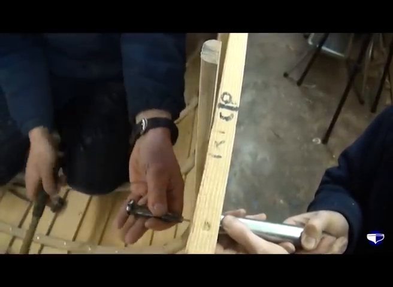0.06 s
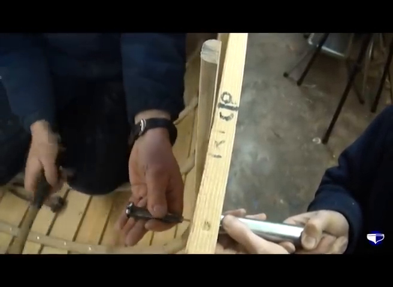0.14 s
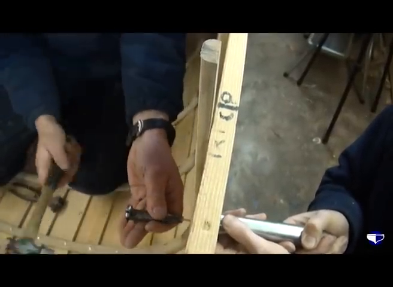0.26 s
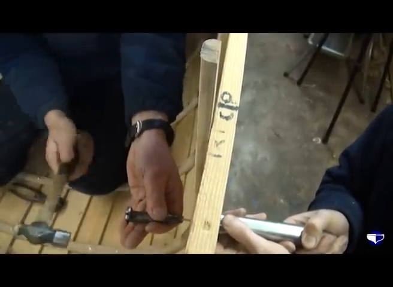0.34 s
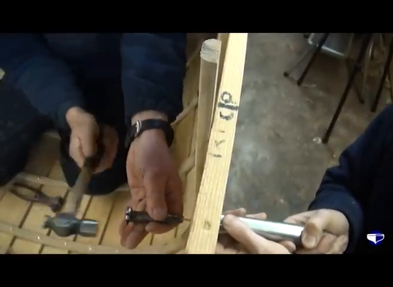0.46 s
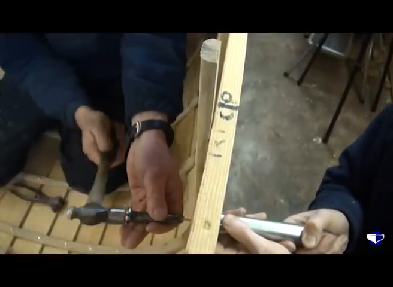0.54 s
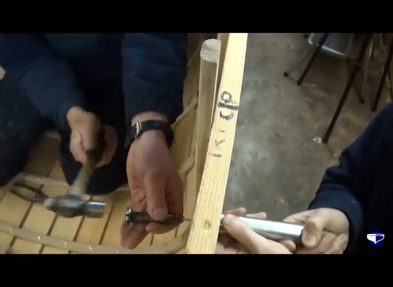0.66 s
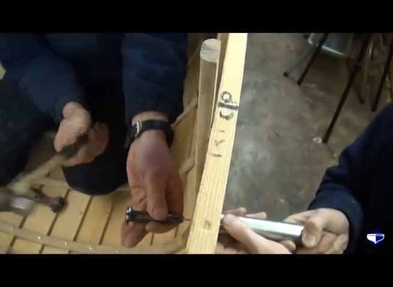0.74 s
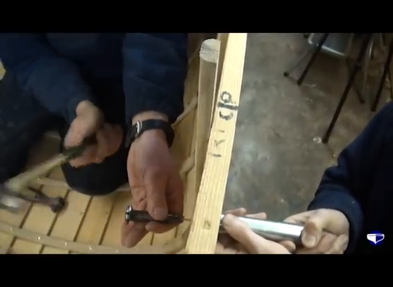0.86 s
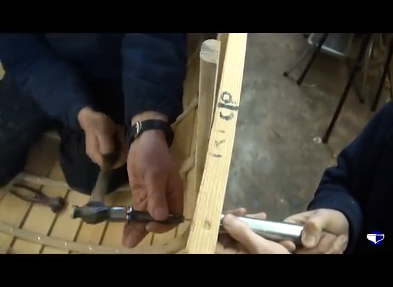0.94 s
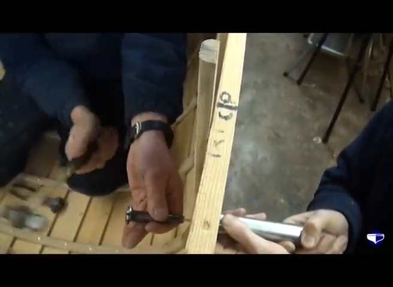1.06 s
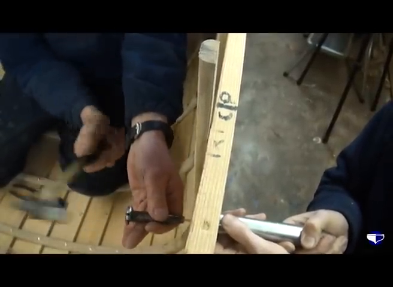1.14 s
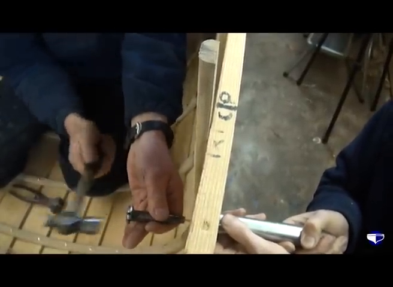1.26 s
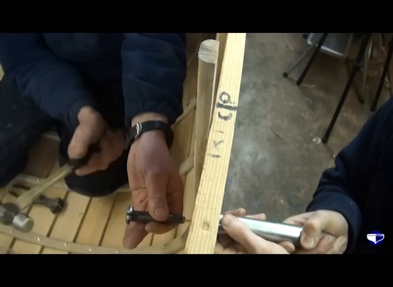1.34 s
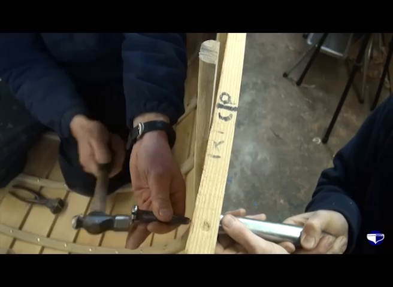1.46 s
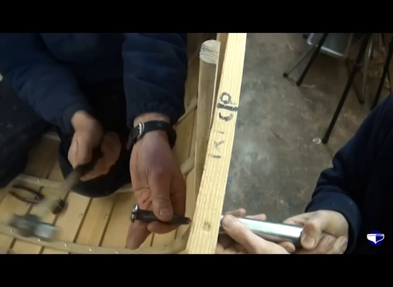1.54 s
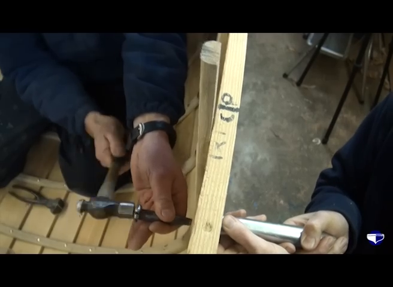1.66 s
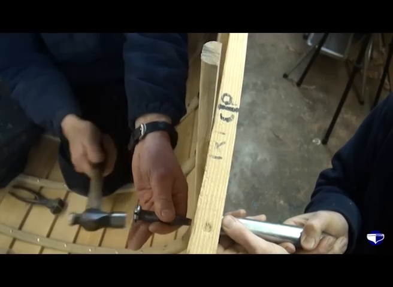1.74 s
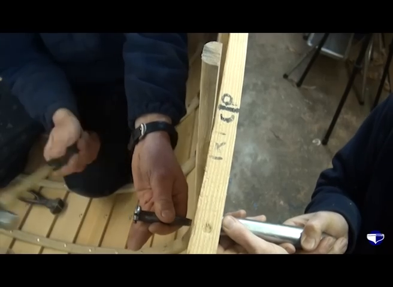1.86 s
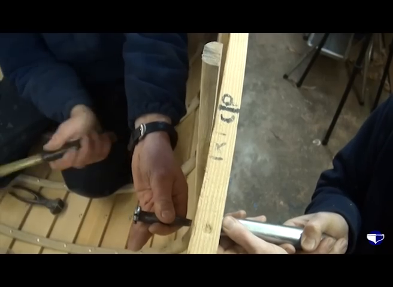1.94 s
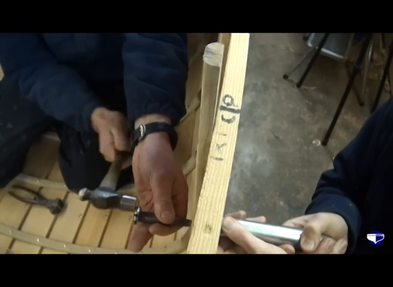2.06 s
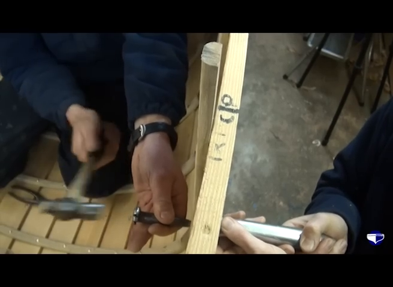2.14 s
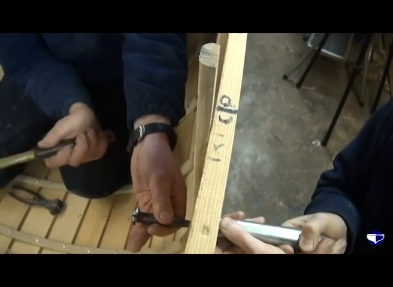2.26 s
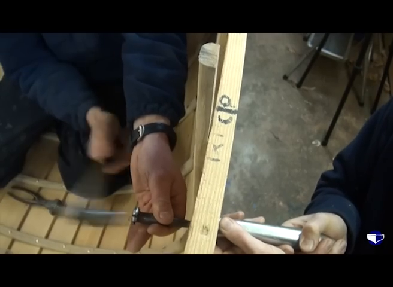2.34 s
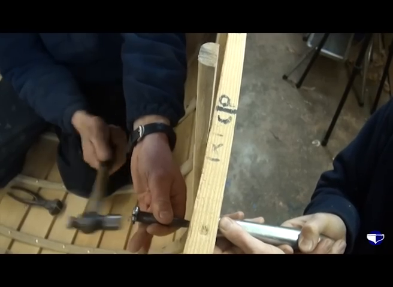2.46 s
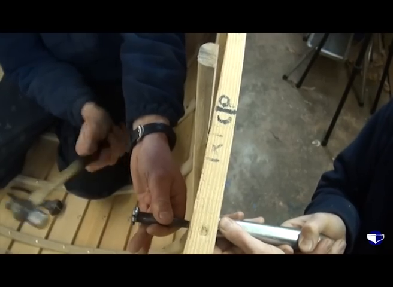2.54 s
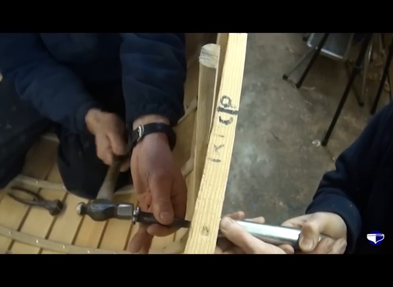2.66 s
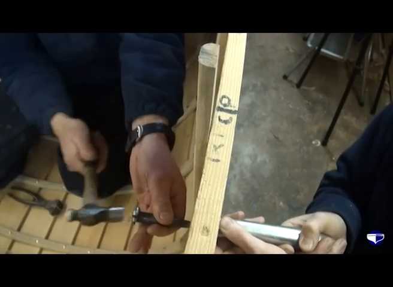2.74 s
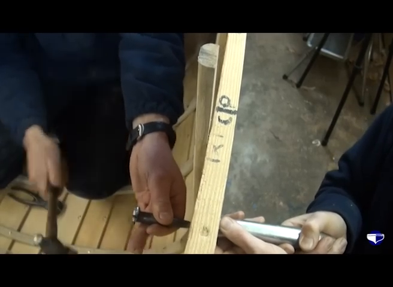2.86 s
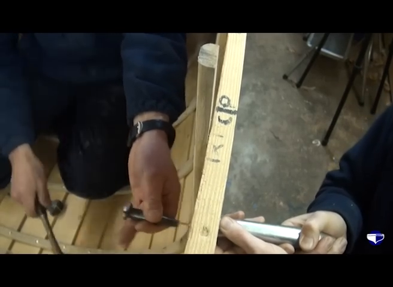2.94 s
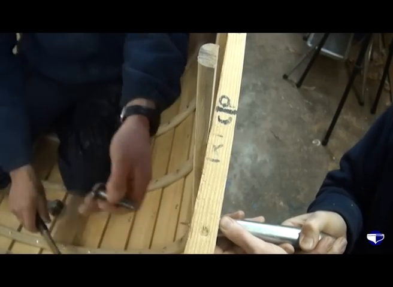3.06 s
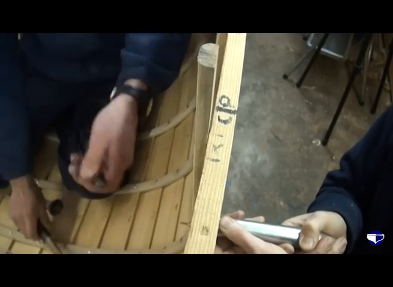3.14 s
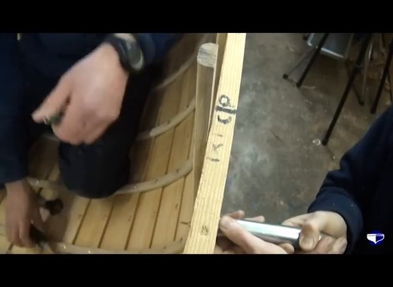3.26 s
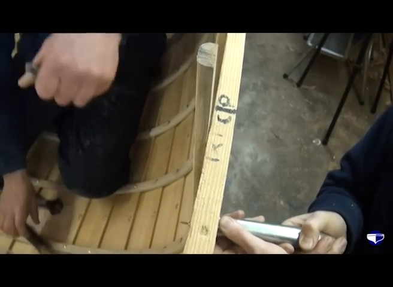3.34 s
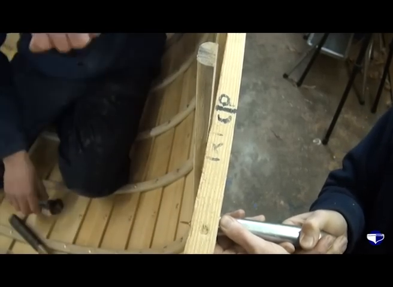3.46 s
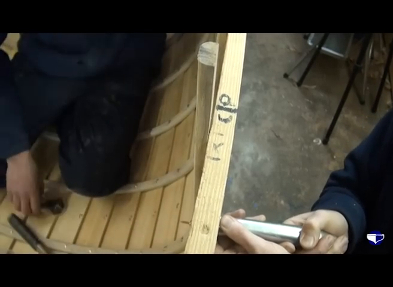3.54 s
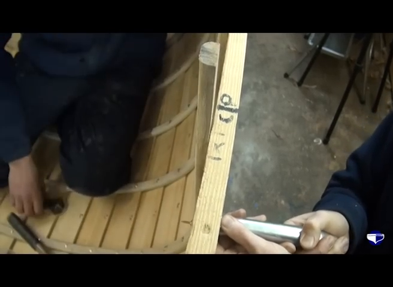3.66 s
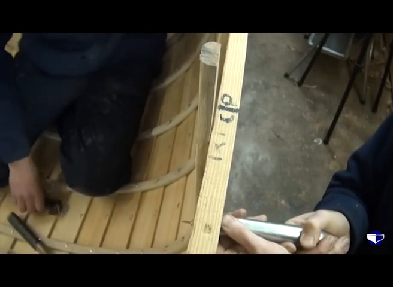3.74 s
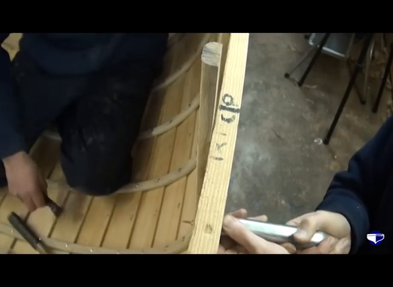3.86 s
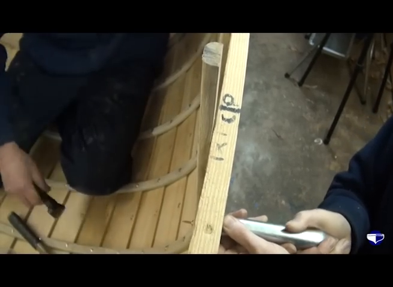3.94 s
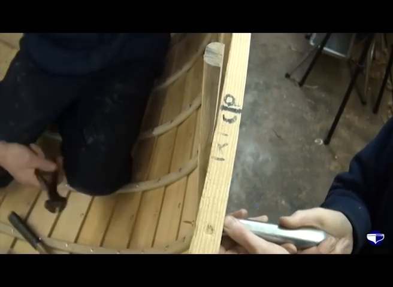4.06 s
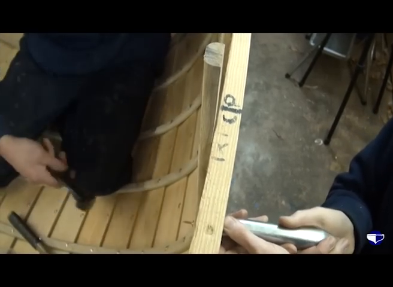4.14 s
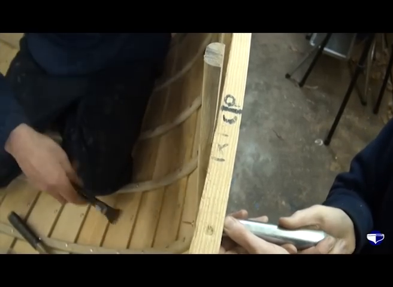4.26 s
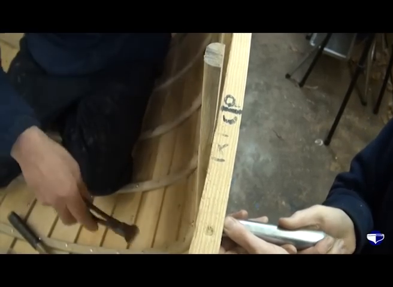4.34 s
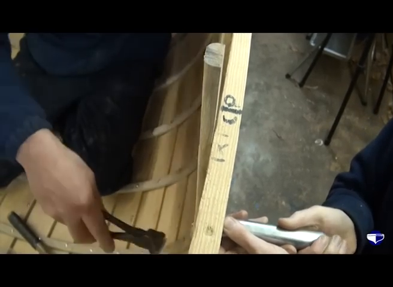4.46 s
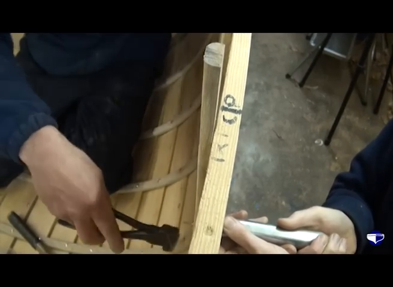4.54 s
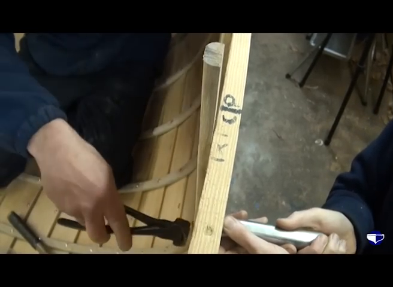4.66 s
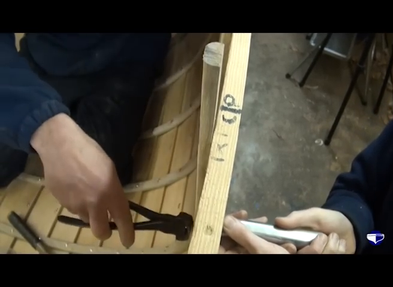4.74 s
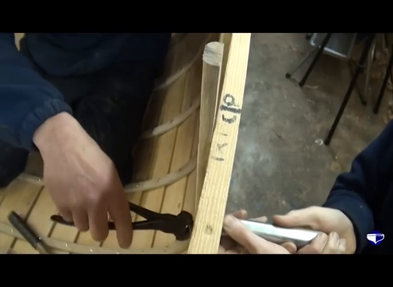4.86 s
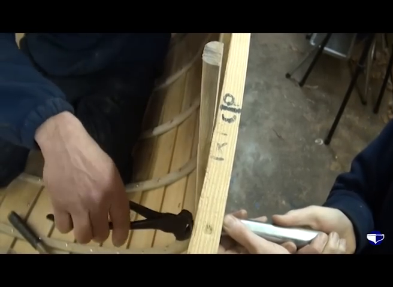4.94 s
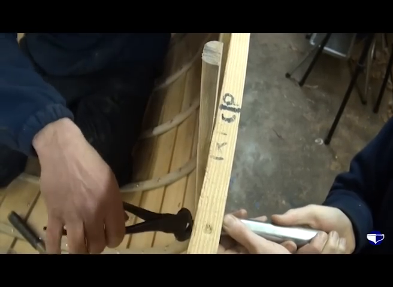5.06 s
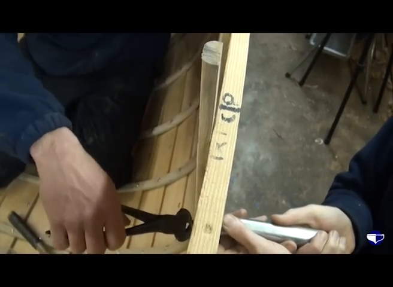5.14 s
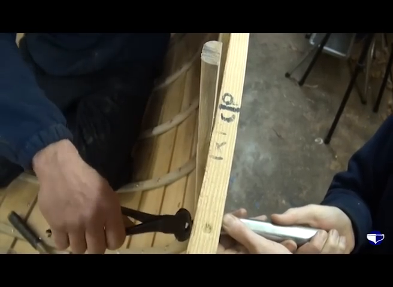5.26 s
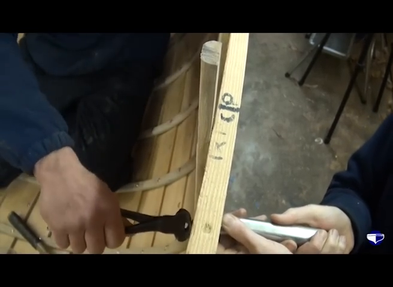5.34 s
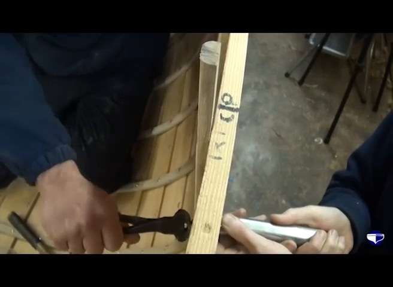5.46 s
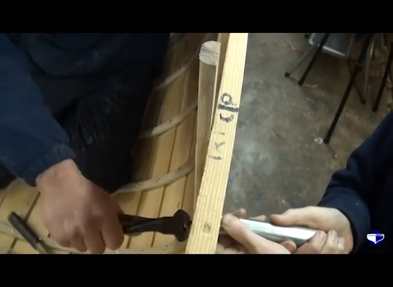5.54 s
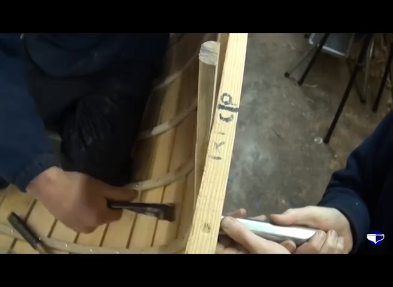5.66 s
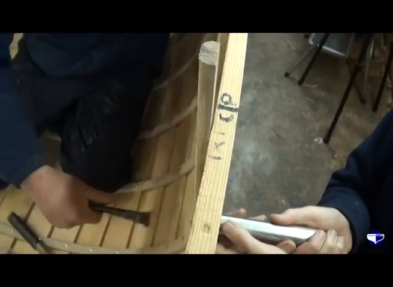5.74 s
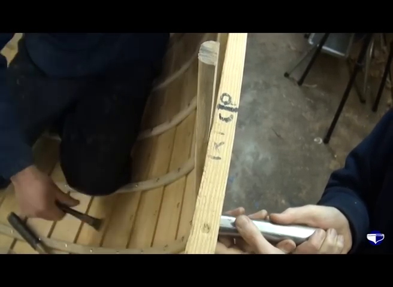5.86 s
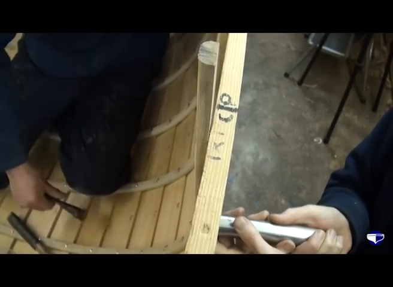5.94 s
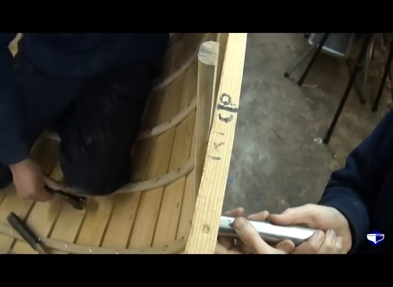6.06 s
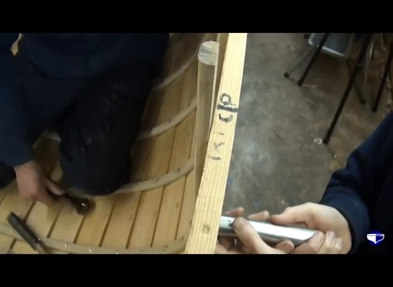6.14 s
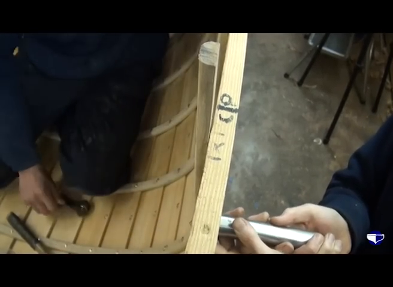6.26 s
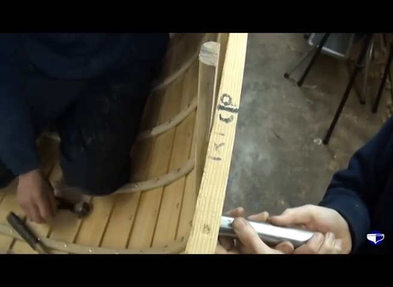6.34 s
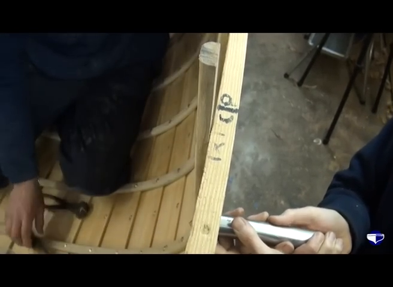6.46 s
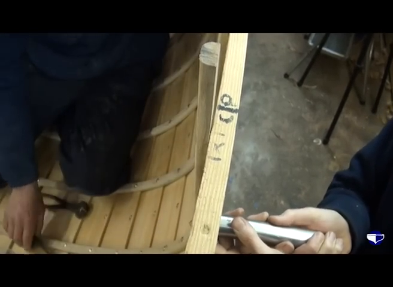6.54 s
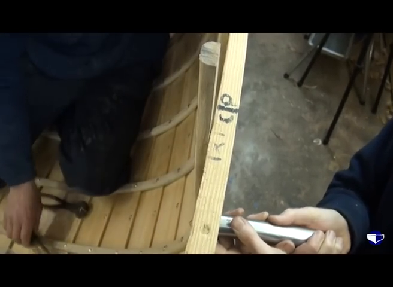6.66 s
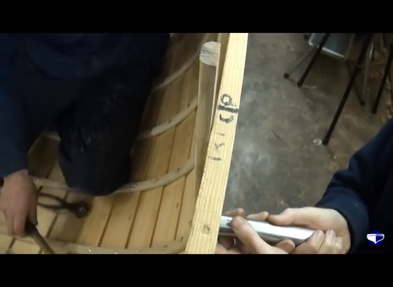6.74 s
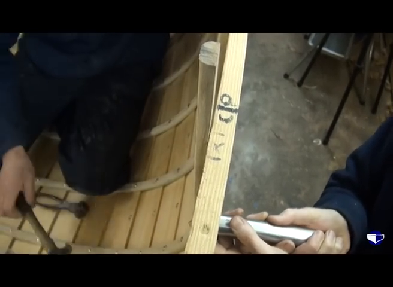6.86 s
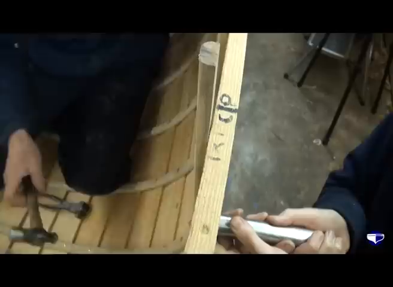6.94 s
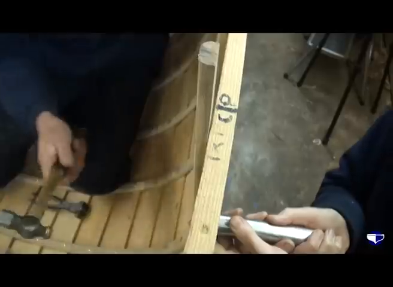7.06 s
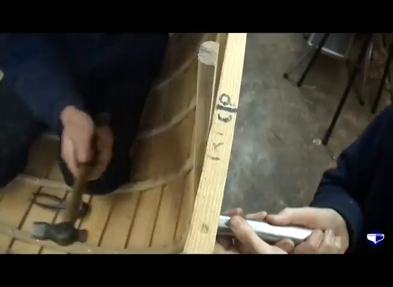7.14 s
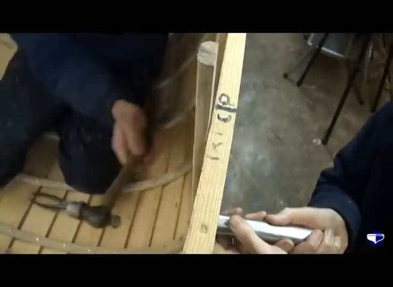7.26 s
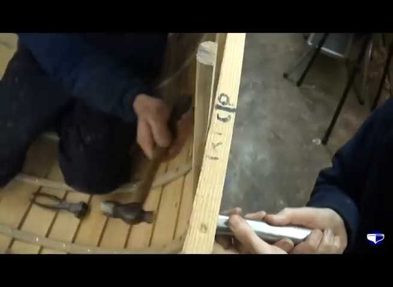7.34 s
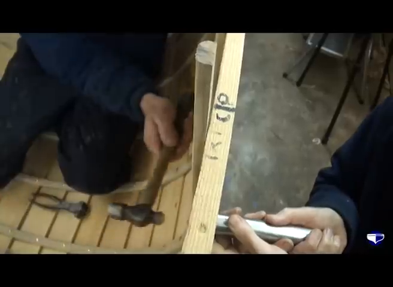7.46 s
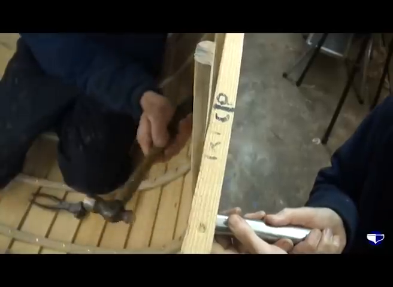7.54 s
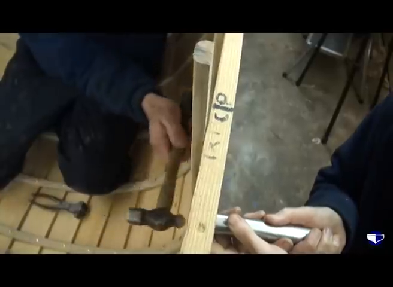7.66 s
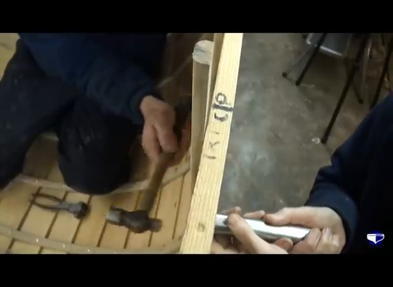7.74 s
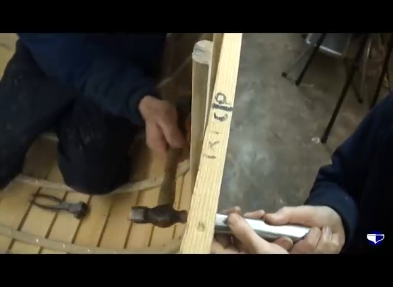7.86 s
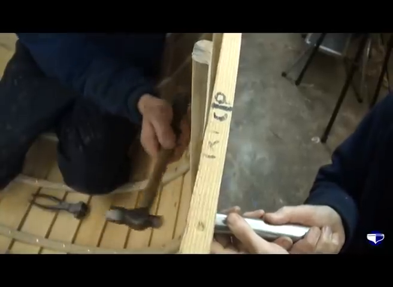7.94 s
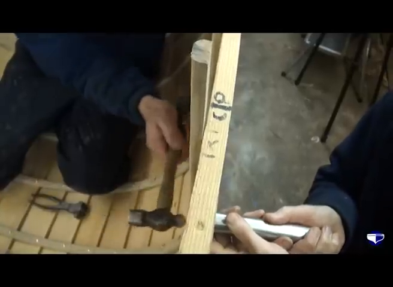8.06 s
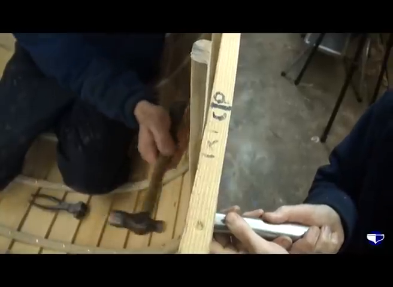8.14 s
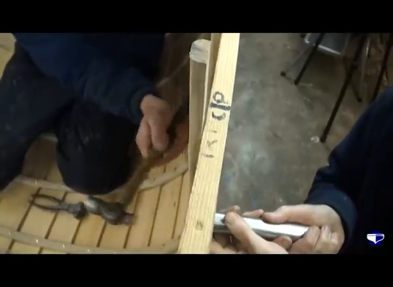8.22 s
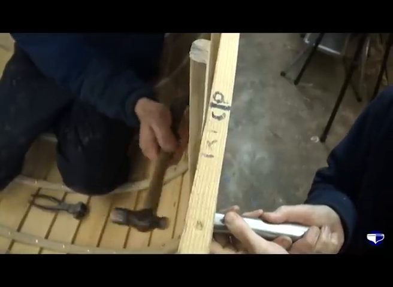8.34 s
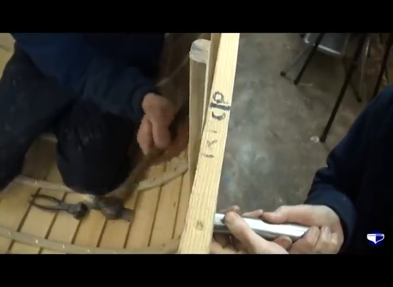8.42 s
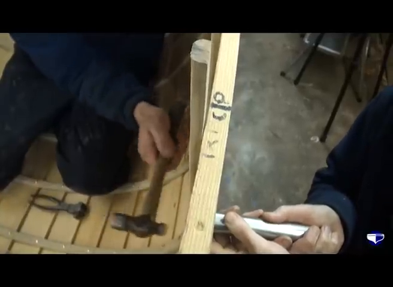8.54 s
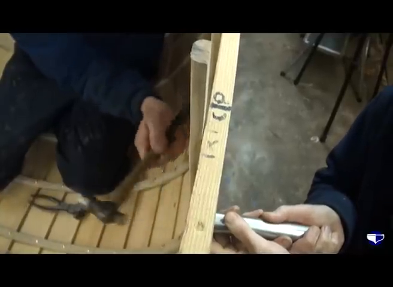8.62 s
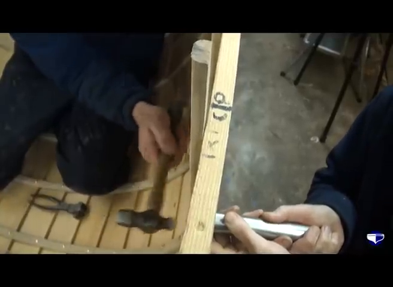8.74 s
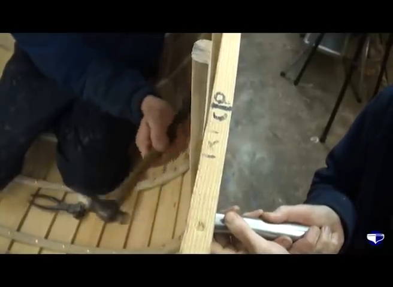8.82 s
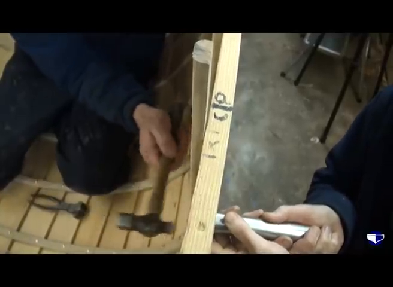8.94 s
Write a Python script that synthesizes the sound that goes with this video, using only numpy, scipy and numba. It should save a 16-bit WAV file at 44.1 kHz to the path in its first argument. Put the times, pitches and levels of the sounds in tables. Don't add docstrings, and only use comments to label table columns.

```python
import sys
import numpy as np
from scipy import signal
from scipy.fft import rfft, irfft
from scipy.io import wavfile
from scipy.ndimage import uniform_filter1d, map_coordinates
from numba import njit

SR = 44100
rng = np.random.default_rng(int(sys.argv[2]) if len(sys.argv) > 2 else 0)


def undo_db(level):
    steps = np.asarray(level, float) / 20
    return 10 ** steps


def transcribe(u):
    v = np.clip(np.atleast_2d(u).T, -1, 1)
    q = np.round(v * 32767).astype(np.int16)
    wavfile.write(sys.argv[1], SR, q)


N = 396459


def along(points, hz):
    f, v = np.transpose(points)
    return np.interp(np.log(hz + 1), np.log(f + 1), v)


def unit(x):
    return x / np.sqrt(np.mean(x ** 2, axis=(-2, -1), keepdims=True) + 1e-20)


def add(out, sounds, times):
    for sound, s in zip(sounds, times):
        part = out[..., round(s * SR):][..., :sound.shape[-1]]
        part += sound[..., :part.shape[-1]]
    return out


def wander(count, length, step):
    return step * np.cumsum(rng.standard_normal((count, length)), axis=1)


# (frequency [Hz], left minus right [dB])
LEAN = [(60, -2.5), (180, -0.5), (400, 2), (950, 1.5), (3770, 1.05), (15000, 0.2)]
# (frequency [Hz], phase by which left leads [rad])
LEAD = [(60, -.1), (150, -0.78), (350, -0.98), (860, -0.99), (1400, -1.5), (2000, -.1), (15000, .01)]


def stereo(pair, gain, alike, aside=1):
    hz = np.fft.rfftfreq(pair.shape[-1], 1 / SR)
    turn = np.arccos(np.clip(along(alike, hz), -1, 1)) / 2
    turn = turn * np.where(hz < 11000, 1, 0.45)
    z = rfft(pair) * gain(hz)
    mid = z[..., 0, :] * np.cos(turn)
    side = z[..., 1, :] * np.sin(turn)
    lean = undo_db(aside * along(LEAN, hz) / 2) * np.exp(0.5j * aside * along(LEAD, hz))
    both = np.stack([(mid + side) * lean, (mid - side) / lean], axis=-2)
    return unit(irfft(both, pair.shape[-1]))


# (frequency [Hz], density [dB per Hz])
HISS_TONE = [(15, -40), (25, -6), (113, 3.5), (188, -0.5), (216, 3.5), (400, -8.5), (510, -10.5), (553, -7),
             (1180, -9.5), (4640, -14), (6950, -15), (9350, -16.5), (15600, -15)]
# (frequency [Hz], left-right likeness [-1 to 1])
HISS_ALIKE = [(60, 0.84), (180, 1), (550, 0.3), (1650, 0.28), (4970, 0.58), (15000, 1.0)]


def hiss():
    def gain(hz):
        tone_db = along(HISS_TONE, np.minimum(hz, 15000)) + 2.5 * (hz > 11300)
        return undo_db(tone_db) * (hz < 15760)
    return undo_db(-66.5) * stereo(rng.standard_normal((2, N)), gain, HISS_ALIKE, aside=0.3)


def lumps(rate, depth_db):
    knots = rng.standard_normal(int(N * rate / SR) + 4)
    return undo_db(depth_db * map_coordinates(knots, [np.arange(N) * rate / SR]))


# (frequency [Hz], left-right likeness [-1 to 1])
ALIKE = [(40, 0.8), (90, 1), (200, 0.91), (380, 0.44), (700, 0.53), (1290, 0.03), (2380, 0.58),
         (4400, 0.68), (8120, 0.55), (15000, 0.36)]
# (frequency [Hz], density [dB per Hz])
CREAK_TONE = [(18, -61.5), (30, -23), (70, -8.5), (245, -5), (680, -12), (1000, -14.5), (1500, -25),
              (3000, -28.5), (3900, -50.5), (6600, -120)]
# (frequency [Hz], density [dB per Hz])
CLOTH_TONE = [(590, -28.5), (1000, 1.5), (1550, -1), (3170, 0), (4200, -3), (7220, -10.5), (11000, -13),
              (14300, -62.5), (22000, -120)]
# (time [s], length [s], level [dB], cloth over creak [dB])
SHIFTS = [(-.05, .14, -47.5, -8), (0.097, 0.087, -51.5, -3), (0.224, 0.43, -56.5, -6),
          (0.333, 0.056, -53, -25), (0.803, 0.26, -57.5, -8.5), (2.979, 0.031, -58, 6.5),
          (3.66, 0.18, -59, -11), (4.04, 0.14, -76.5, 5), (4.95, 0.41, -71, -11), (5.653, 0.12, -57.5, -14),
          (5.8, 0.45, -67.5, -5), (6.62, 0.18, -56, -5.5), (6.834, 0.65, -64.5, -4),
          (7.21, 0.097, -58.5, -3.5), (7.4, 0.22, -63.5, -2.5), (7.598, 0.094, -59.5, -3.5)]


def stir():
    s, length, db, cloth_db = np.transpose(SHIFTS)[:, :, None]
    rise_s, fade_s = 0.042, 0.046
    t = np.arange(N) / SR - s
    move = undo_db(db) * np.clip(t / rise_s, 0, 1) * np.exp(-np.clip(t - length, 0, None) / fade_s)
    low = stereo(rng.standard_normal((2, N)), lambda hz: undo_db(along(CREAK_TONE, hz)), ALIKE)
    high = stereo(rng.standard_normal((2, N)), lambda hz: undo_db(along(CLOTH_TONE, hz)), ALIKE)
    creak = move.sum(axis=0) * unit(low * lumps(40, depth_db=3.5))
    cloth = (move * undo_db(cloth_db)).sum(axis=0) * unit(high * lumps(120, depth_db=2.5))
    return creak + cloth


# (time [s], level [dB], frequency [Hz], t60 [s])
HUMS = [
    (3.8, -49, 253.6, 0.15),
    (2.8, -63, 261, 0.43),
    (4.054, -65.5, 333, 0.37),
    (5.5, -24.5, 320, 0.156),
    (7.3, -67, 740, 0.38),
]


def hums():
    s, db, hz, t60 = np.transpose(HUMS)[:, :, None]
    t = np.arange(SR // 3) / SR
    phase = 2 * np.pi * hz * t + wander(len(HUMS), len(t), 0.016)
    swell = 1 - np.exp(-t / 0.0079)
    return add(np.zeros(N), undo_db(db + 9.5 - 60 * t / t60) * swell * np.sin(phase), s.ravel())


# (time [s], level [dB], frequency [Hz])
TICKS = [(0.1214, -46, 1680), (0.2109, -43.5, 1720), (0.402, -29.5, 2360), (6.2748, -33, 2850),
         (6.2752, -40, 5480), (6.466, -38, 5900), (6.469, -36, 4000), (6.5664, -38.5, 1672),
         (7.2719, -42.5, 1856), (7.3307, -48, 2276), (7.3971, -50, 2133), (7.4418, -41.5, 3047),
         (7.5083, -56, 2566), (7.647, -45, 3180), (7.6941, -51, 2967)]


def ticks():
    s, db, hz = np.transpose(TICKS)[:, :, None]
    t = np.arange(SR // 20) / SR
    phase = 2 * np.pi * hz * t + wander(len(TICKS), len(t), 0.16)
    return add(np.zeros(N), undo_db(db - 3.5 - 60 * t / 0.02) * np.sin(phase), s.ravel())


# (time [s], level [dB], low pair [dB], high modes [dB], lowest mode [dB])
CLINKS = [
    (3.7073, -41.5, -6, -12, .1),
    (4.0721, -51.5, 9, 4.5, 1),
    (4.1013, -38, 2, 0, 2),
    (4.1599, -41.5, 11, 0, -6),
    (6.2748, -42, 6, -1, -6),
    (6.406, -20, 2.5, 1, 5),
    (6.4652, -40, -8, 3, .1),
    (6.563, -42, -4, -14, .1),
    (6.8011, -50.5, -11, -7, 0.5),
]
# (frequency [Hz], level [dB], t60 in the hand [s], t60 on the planks [s])
JAWS = [(2554, -9, 0.1, .04), (2810, -6, 0.12, .05), (4530, -4, .08, 0.095), (5480, -6.5, 0.1, .07),
        (5800, -9, .07, .1), (8270, -20, .18, 0.13), (9030, -20, .09, 0.097)]


def clinks():
    t = np.arange(SR // 4) / SR
    hz, level_db, held_s, laid_s = np.transpose(JAWS)[:, :, None]
    s, db, pair_db, high_db, lowest_db = np.transpose(CLINKS)[:, :, None, None]
    mode_db = level_db + (hz < 3500) * pair_db + (hz > 5000) * high_db + (hz == hz.min()) * lowest_db
    mode_db = mode_db + 0.7 * rng.standard_normal((len(CLINKS), len(JAWS), 1))
    phase = 2 * np.pi * hz * t + wander(len(JAWS), len(t), 0.053)
    t60 = np.where(s < 4.5, held_s, laid_s)
    modes = (np.sin(phase) * undo_db(mode_db - 60 * t / t60)).sum(axis=1) * (1 - np.exp(-t / 0.00048))
    crack = 0.3 * undo_db(-60 * t / 0.006) * rng.standard_normal((len(CLINKS), len(t)))
    return add(np.zeros(N), undo_db(db[:, 0] - 9) * (modes + crack), s.ravel())


# (time [s], level [dB], frequency [Hz], length [s])
THUDS = [(3.247, -25, 240, 0.0076), (3.341, -25.5, 698, 0.0061), (3.394, -23, 333, 0.014),
         (4.766, -38.5, 310, .007), (4.834, -36.5, 300, 0.013), (5.541, -21.5, 285, .016),
         (5.594, -32, 300, .012), (6.209, -21, 230, 0.012), (6.248, -20, 420, 0.0084),
         (6.27, -22, 310, 0.015), (6.39, -15.5, 194.7, .02), (6.412, -15.5, 240, 0.016),
         (6.445, -24, 240, .01), (6.464, -24, 250, .016), (6.488, -25, 260, 0.0095)]


def thuds():
    s, db, hz, length = np.transpose(THUDS)[:, :, None]
    t = np.arange(SR // 20) / SR
    swing = np.sin(np.pi * np.clip(t / (1.25 * length), 0, 1)) ** 0.77
    return add(np.zeros(N), undo_db(db) * np.nan_to_num(swing) * np.sin(2 * np.pi * hz * t), s.ravel())


# (time [s], level [dB], top frequency [Hz], t60 [s])
CRACKS = [(.6073, -19.5, 6000, .006), (3.2392, -29.5, 4000, .012), (3.2546, -25, 6500, .012),
          (3.33, -32, 4000, 0.018), (3.3665, -30, 4500, 0.018), (3.4005, -32, 6000, .015),
          (4.1598, -53, 5000, .015), (4.772, -42, 4970, .015), (4.817, -43.5, 6500, .02),
          (6.2066, -35, 6000, .012), (6.2492, -29.5, 4000, .012), (6.3973, -33, 5000, .012),
          (6.4652, -33, 6000, .012), (6.548, -50, 6000, .01), (7.7394, -24, 4000, .008)]


def cracks():
    s, db, top_hz, t60 = np.transpose(CRACKS)[:, :, None]
    t = np.arange(2048) / SR
    hz = np.fft.rfftfreq(len(t), 1 / SR)
    burst = rng.standard_normal((len(s), len(t))) * undo_db(db - 0.5 - 60 * t / t60)
    low_cut = (1j * hz / 600) / (1 + 1j * hz / 600)
    return add(np.zeros(N), irfft(rfft(burst) * low_cut / (1 + 1j * hz / top_hz) ** 2), s.ravel())


# (frequency [Hz], level [dB], t60 [s])
SNIP_MODES = [(1055, -1, 0.14), (1184, -7.5, 0.26), (1260, -1.5, 0.12), (1787, -24, 0.25),
              (2210, -30, 0.54), (3009, -20, 0.23), (3865, -27, 0.33), (4350, -19, 0.16), (4587, -25, 0.17)]


def snip():
    hz, db, t60 = np.transpose(SNIP_MODES)[:, :, None]
    t = np.arange(SR // 3) / SR
    phase = 2 * np.pi * hz * t + wander(len(hz), len(t), 0.035)
    modes = undo_db(-27.5 + db - 60 * t / t60) * np.sin(phase)
    ring = modes.sum(axis=0) * (1 - np.exp(-t / 0.002))
    return add(np.zeros(N), [ring], [5.503])


def resonances(peaks, hz):
    return sum(lift / (1 + (2 * (hz - centre) / width) ** 2) for centre, width, lift in peaks)


# (frequency [Hz], t60 [s])
SHOP = [(60, 0.88), (250, 0.49), (800, 0.43), (2500, 0.39), (6000, 0.31), (14000, 0.21)]
# (frequency [Hz], t60 [s])
HULL = [(60, 0.042), (300, 0.33), (1000, 0.19), (4000, 0.15), (14000, 0.043)]


def contacts(rows, rebound, tone, peaks, spots, drive_db, close_db, click_db, echo_db, gap, rise, same, snap, bloom):
    s, db, boom_db, knock_db, edge_db = np.transpose(rows)[:, :, None, None]
    spacing_hz, first_hz, share = np.transpose(rebound)[:, :, None, None]
    size = 3 * 2 ** 13
    t = np.arange(size) / SR
    draws = rng.standard_normal((len(rows) + 1, 2, size))

    def shared(common, own):
        return np.sqrt(same) * common + np.sqrt(1 - same) * own

    def gain(hz):
        lift_db = resonances(peaks, hz)
        lift_db = lift_db + resonances(np.transpose(spots, (1, 2, 0))[..., None, None], hz)
        place = np.log1p(hz / 300) / np.log1p(hz[-1] / 300) * 299
        knots = shared(draws[0, 0, :300], draws[1:, 0, :300])
        lift_db = lift_db + 2 * np.array([map_coordinates(row, [place]) for row in knots])[:, None]
        boom = 1 / (1 + (hz / 480) ** 4)
        knock = np.exp(-np.log((hz + 1) / 900) ** 2 / 0.28)
        edge = 1 / (1 + (4000 / (hz + 1)) ** 3)
        twice = np.abs(1 + share * (1 - boom) * np.exp(2j * np.pi * (hz - first_hz) / spacing_hz))
        return twice * undo_db(along(tone, hz) + lift_db + boom_db * boom + knock_db * knock + edge_db * edge)

    noise = stereo(shared(draws[0], draws[1:]), gain, ALIKE)
    hz, frame_s, z = signal.stft(noise, SR, nperseg=256)
    far = undo_db(-60 * frame_s / along(SHOP, hz)[:, None])
    close = undo_db(close_db - 60 * frame_s / along(HULL, hz)[:, None])
    late = 1 - 0.55 * np.exp(-frame_s / bloom) / (1 + (hz[:, None] / 1150) ** 4)
    ring = signal.istft(z * late * np.hypot(far, close), SR, nperseg=256)[1][..., :size]
    wood = irfft(rfft(ring) / (1 + (np.fft.rfftfreq(size, 1 / SR) / 1400) ** 4), size)
    bright = ring - wood
    echo = 1 - np.exp(-np.clip(t - gap, 0, None) / 0.0029)
    click = (undo_db(click_db - 60 * t / 0.012) + 0.082) * (1 - np.exp(-(t / 0.00017) ** 2))
    returned = echo * (1 + undo_db(echo_db - 60 * (t - gap) / snap))
    swell = 1 - np.exp(-(t / rise) ** 1.2)
    blow = wood * swell + bright * np.maximum(click * (1 - echo), returned)
    fade = np.clip((t[-1] - t) * 10, 0, 1)
    return add(np.zeros((2, N)), undo_db(db + drive_db) * blow * fade, s.ravel())


# (time [s], level [dB], hull boom [dB], rib knock [dB], steel edge [dB])
DROPS = [(3.23, -17.5, 14, 5, -5), (3.238, -11, 2, 15, 5.5), (3.254, -5, -13.5, -5, 2.5),
         (3.329, -13.5, -5, 7, -3), (3.341, -17.5, -5, 9, -16), (3.367, -14.5, -2, -7, -9),
         (3.397, -9, 3.5, 4, -0.5), (3.435, -16.5, 9, -1, 0.5), (3.608, -44, -16, 3, 13),
         (3.707, -43, -18, -2, 2), (6.2, -10, 17, -4, -1), (6.206, -10.5, 2.5, 3, 1.5),
         (6.248, -9, 6, 1.5, -10), (6.274, -15, 10, -6, -7.7), (6.388, -8, 16.5, 8, 0.1),
         (6.399, -5, 2, -4, 0.5), (6.412, -19.5, -3.5, 8, 15.5), (6.464, -12.5, -3.5, -10.5, -11),
         (6.567, -37.5, -11, 1, 1), (6.759, -43, -10, 7, -4), (7.264, -41, 8, 5, 0.1)]
# (comb spacing [Hz], first peak [Hz], share [0-1])
DROP_REBOUND = [(1718, 580, 0.062)]
# (frequency [Hz], density [dB per Hz])
DROP_TONE = [(18, -52), (30, -25), (234, -2), (748, -16), (899, -24), (999, -17), (1880, -26),
             (4610, -35.5), (7610, -50), (13900, -55.5), (16300, -80.5)]
# (frequency [Hz], width [Hz], lift [dB])
DROP_PEAKS = [(215, 41, 0), (328.7, 50, 5), (5570, 560, 4)]
# (frequency [Hz], width [Hz], lift [dB])
HAMMER_SPOT = [(810, 270, 3.9), (2570, 2870, 1.7)]
# (frequency [Hz], width [Hz], lift [dB])
NIPPER_SPOT = [(825, 380, 5.9), (319, 87, 1.4)]


def tools_laid_down():
    spots = [HAMMER_SPOT if row[0] < 4.5 else NIPPER_SPOT for row in DROPS]
    return contacts(DROPS, DROP_REBOUND, DROP_TONE, DROP_PEAKS, spots,
                    drive_db=-19.5, close_db=8.5, click_db=-13, echo_db=11.5, gap=0.00063, rise=0.0042,
                    same=0.071, snap=0.018, bloom=0.0035)


# (time [s], level [dB], hull boom [dB], rib knock [dB], steel edge [dB])
NIPS = [
    (4.768, -28.5, -3, -2.5, -5),
    (4.786, -25.5, 3.6, 9, -3),
    (4.81, -24.5, -1.5, -4, 3.5),
    (4.836, -25.5, 4.5, 1.5, -2),
    (5.405, -52, -5, 8.5, -1.5),
    (5.498, -13, -1, 3, 6),
    (5.543, -22, 12, 4, -19.5),
    (5.672, -36.5, -2, 0, -20),
]
# (comb spacing [Hz], first peak [Hz], share [0-1])
NIP_REBOUND = [(1810, 740, 0.2)]
# (frequency [Hz], density [dB per Hz])
NIP_TONE = [(18, -71), (30, -39), (171, -18), (305, -14), (377, -15), (923, -25), (1300, -26.5),
            (1930, -27), (3020, -31.5), (11900, -53.5), (16300, -55.5)]
# (frequency [Hz], width [Hz], lift [dB])
NIP_PEAKS = [(311, 100, 7.5), (1269, 32.8, 6.5), (3136, 79, 7.5), (9670, 1100, 11.5), (11960, 1400, 12),
             (15000, 2000, 11.5)]
# (frequency [Hz], width [Hz], lift [dB])
GRIP_SPOT = [(2460, 300, -12), (3540, 240, 7.5), (4200, 360, 7.5), (9800, 560, -14)]
# (frequency [Hz], width [Hz], lift [dB])
SNIP_SPOT = [(1217, 220, 10.5), (3500, 150, -21), (4200, 580, 7), (5300, 140, 4.5)]


def nippers_on_nail():
    spots = [GRIP_SPOT if row[0] < 5 else SNIP_SPOT for row in NIPS]
    return contacts(NIPS, NIP_REBOUND, NIP_TONE, NIP_PEAKS, spots,
                    drive_db=-17, close_db=9, click_db=-14, echo_db=8.5, gap=0.0053, rise=0.003,
                    same=0.036, snap=0.05, bloom=0.003)


def landing(rows, second, rings, faces):
    twice = [(spacing, first, second) for spacing, first, *_ in rows]
    spots = []
    for (*_, woken, lift_db, muted), ring, face in zip(rows, rings, faces):
        spots.append([(woken, 0.12 * woken, lift_db), (muted, 0.12 * muted, -7), *ring, face])
    return twice, spots


# (time [s], level [dB], hull boom [dB], rib knock [dB], steel edge [dB])
PEEN = [
    (7.7394, -12.5, 5, -3.5, -12.5),
    (7.9471, -10, 2, 1, -17.5),
    (8.1453, -12, 0.5, -7, -6),
    (8.3473, -11.5, 1.9, -3.5, 1),
    (8.5475, -12, -1.2, -4, 0.5),
    (8.7516, -13, 0.1, -6.5, -0.9),
    (8.9527, -12, 1.2, -2, 1),
]
# (comb spacing [Hz], first peak [Hz], woken mode [Hz], lift [dB], muted mode [Hz])
PEEN_LANDS = [(1273, 510, 7800, 4, 4340), (2150, 470, 1380, 4, 950), (1250, 783, 5200, 3, 3620),
              (1170, 93, 4590, 3.5, 7450), (1938, 760, 7580, 3.5, 4540), (1960, 910, 8460, 5, 5500),
              (2030, 800, 6800, 6, 5600)]
# (frequency [Hz], width [Hz], lift [dB])
PEEN_RINGS = [
    [(517, 26, 3.4), (2820, 143, 1.5), (6920, 349, 4.7), (6188, 371, -5.6)],
    [(353, 20, 6), (500, 28, 6), (8326, 416, 4.3), (4092, 246, -2.8)],
    [(480, 24, 4.8), (1053, 53, 3.5), (3401, 170, 3), (6240, 375, -4)],
    [(729, 37, 0.5), (1058, 53, 1.5), (8205, 410, 2), (377, 23, -9)],
    [(1053, 53, 4.7), (1310, 66, 2.5), (4644, 232, 4), (1752, 105, 0)],
    [(1058, 53, 6.5), (1282, 66, 3), (3685, 182, 3), (375, 23, -8)],
    [(1888, 94, 3), (2467, 123, 5), (3500, 179, 4), (653, 36, -7.5)],
]
# (frequency [Hz], width [Hz], lift [dB])
PEEN_FACES = [(2160, 600, 3), (3000, 900, 1.5), (12500, 3000, -2.5), (4000, 1500, 1.5), (4000, 1500, 1),
              (4000, 1500, 1.5), (4000, 1500, 1.5)]
# (frequency [Hz], density [dB per Hz])
PEEN_TONE = [(18, -55), (30, -34), (104, -13), (150, -18), (322, -8), (430, -9.5), (673, -0.5),
             (1780, -8.5), (2510, -10.5), (4730, -15.5), (6100, -20.5), (8300, -26.5), (12200, -35.5),
             (15100, -40.5), (16300, -71)]
# (frequency [Hz], width [Hz], lift [dB])
PEEN_PEAKS = [(211, 40, 9), (324.6, 110, 6.5), (1070, 22, -1.5), (1297, 50, 5.5), (2800, 110, 2.5),
              (3690, 530, 5), (4640, 100, 3), (12100, 530, 8)]


def peening():
    twice, spots = landing(PEEN_LANDS, 0.2, PEEN_RINGS, PEEN_FACES)
    return contacts(PEEN, twice, PEEN_TONE, PEEN_PEAKS, spots,
                    drive_db=5.5, close_db=-39, click_db=-8, echo_db=7.5, gap=0.0054, rise=0.0025,
                    same=0.6, snap=0.051, bloom=0.027)


# (time [s], level [dB], hull boom [dB], rib knock [dB], steel edge [dB])
PUNCH = [
    (0.6075, -12.5, 4.5, 15.5, -7.5),
    (1.0073, -7, 0.6, 6, -2.5),
    (1.2568, -8, -2, -2.5, -4),
    (1.4898, -10, -3.5, 7.5, 3.5),
    (1.7301, -9, 1.5, 12.5, -1.5),
    (2.1164, -9, 4.5, 9.5, 3.5),
    (2.4348, -10, 5, 9, 2.5),
    (2.7202, -12, 3, 8.5, 1),
]
# (comb spacing [Hz], first peak [Hz], woken mode [Hz], lift [dB], muted mode [Hz])
PUNCH_LANDS = [(1930, 1000, 9500, 8, 6700), (1620, 664, 1250, 12, 6940), (1360, 1150, 5374, 7, 2310),
               (1420, 880, 2970, 5, 2240), (864, 29, 2860, 4, 7200), (2000, 34, 27000, 5, 9730),
               (2100, 26, 3400, 1, 9700), (1928, 85, 630, 3, 9700)]
# (frequency [Hz], width [Hz], lift [dB])
PUNCH_RINGS = [
    [(364, 18, 7), (1053, 53, 5), (1317, 66, 3), (510, 31, -5.5)],
    [(1043, 52, 5), (2431, 122, 5), (3303, 165, 5), (2896, 174, -4.5)],
    [(740, 31, 5.5), (1060, 52, 5), (1860, 93, 5), (5865, 352, -4.5)],
    [(610, 31, 4.5), (696, 35, 7), (1330, 66, 5.8), (458, 27, -6)],
    [(638, 44, 4.5), (734, 37, 5.5), (2772, 139, 3.5), (1906, 114, -5.5)],
    [(505, 25, 4), (1048, 52, 5.5), (1569, 78, 4), (1437, 86, -5.5)],
    [(361, 18, 4), (1017, 51, 2.5), (1546, 77, 4), (4995, 300, -1)],
    [(486, 25, 6), (1053, 53, 7), (2799, 140, 4.5), (5069, 304, -4.5)],
]
# (frequency [Hz], width [Hz], lift [dB])
PUNCH_FACES = [(2800, 450, 3), (1650, 350, -4), (1250, 450, -2.5), (12300, 4000, -4), (850, 400, 2),
               (8600, 2500, -3.5), (85, 66, -7.5), (85, 60, -7)]
# (frequency [Hz], density [dB per Hz])
PUNCH_TONE = [(18, -51), (30, -18), (146, -10), (211, -2), (560, -9), (1050, -11.5), (1410, -7),
              (2040, -2.5), (3100, -7.5), (4150, -4), (4990, -9.5), (13600, -19.5), (16300, -49.5)]
# (frequency [Hz], width [Hz], lift [dB])
PUNCH_PEAKS = [(210, 80, 2), (337, 52, 6.5), (1070, 22, 4.5), (2650, 31, 3.5), (9560, 430, 9),
               (12500, 720, 2), (10800, 610, -3)]


def punching():
    twice, spots = landing(PUNCH_LANDS, 0.31, PUNCH_RINGS, PUNCH_FACES)
    return contacts(PUNCH, twice, PUNCH_TONE, PUNCH_PEAKS, spots,
                    drive_db=4, close_db=-19.5, click_db=-8, echo_db=9, gap=0.006, rise=0.0025,
                    same=0.6, snap=0.054, bloom=0.022)


def scene():
    leftward = undo_db([[0.7], [-0.7]])
    small = hums() + ticks() + clinks() + thuds() + cracks() + snip()
    blows = tools_laid_down() * leftward + nippers_on_nail() + peening() + punching()
    return stir() + small * undo_db([[0.8], [-0.8]]) + blows


@njit
def follower(level, attack, release):
    held, out = 0., np.empty_like(level)
    for i in range(len(level)):
        held += (level[i] - held) * (attack if level[i] > held else release)
        out[i] = held
    return out


# (frequency [Hz], margin [dB])
SPARE = [(9500, -15), (10500, -1.3), (14400, -1.1), (15200, 9), (16000, 15)]


def thin_treble(x, busy_db):
    hz, _, z = signal.stft(x, SR, nperseg=2048)
    bands = np.mean(np.abs(z[:, :-1]) ** 2, axis=0).reshape(64, 16, -1).mean(axis=1)
    treble = bands[3:30].sum(axis=0)
    busy = (treble > undo_db(2 * busy_db)) & (treble < 2 * np.roll(treble, 2))
    margin = undo_db(2 * along(SPARE, hz[8::16]))[:, None]
    weak = bands < uniform_filter1d(bands, size=3, axis=0) * margin
    z[:, :-1] *= np.repeat(~(busy & weak), 16, axis=0)
    z[:, hz > 16500] = 0
    return signal.istft(z, SR, nperseg=2048)[1][:, :N]


def low_pass(x):
    return signal.sosfilt(signal.butter(12, 16490, fs=SR, output="sos"), x)


def record(dry):
    x = signal.lfilter(*signal.butter(2, 70, 'high', fs=SR), dry) + hiss()
    attack_s, release_s, threshold_db = 0.00016, 0.02, -13
    held = follower(np.abs(x).max(axis=0), 1 / (attack_s * SR), 1 / (release_s * SR))
    x = x / (1 + (held / undo_db(threshold_db)) ** 4) ** (0.89 / 4)
    x = x / (1 + np.abs(x / 0.75) ** 4) ** 0.25
    mix = thin_treble(x, busy_db=-55.5)
    return low_pass(mix)


dry = scene()
out = record(dry)
transcribe(out)
```